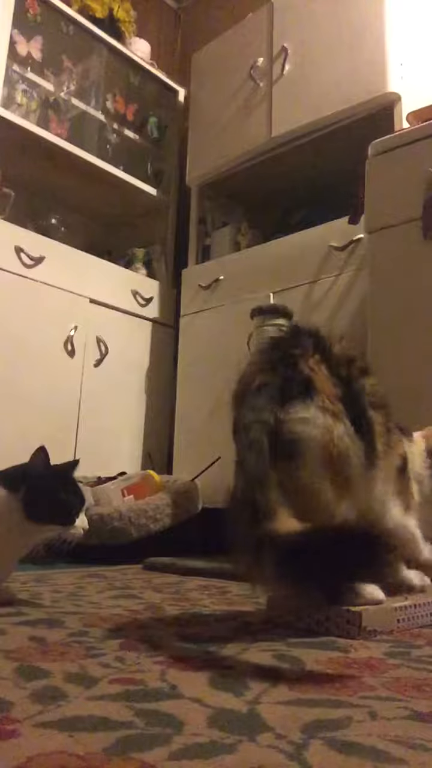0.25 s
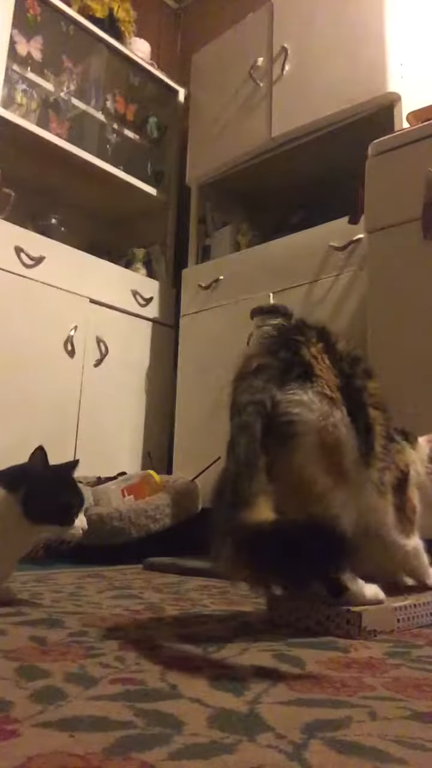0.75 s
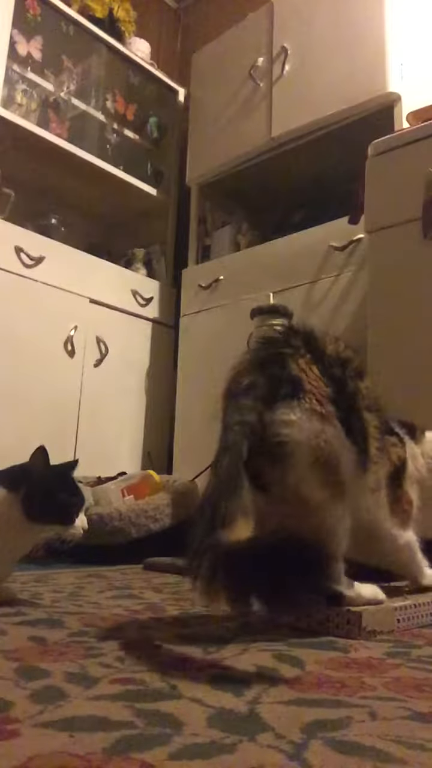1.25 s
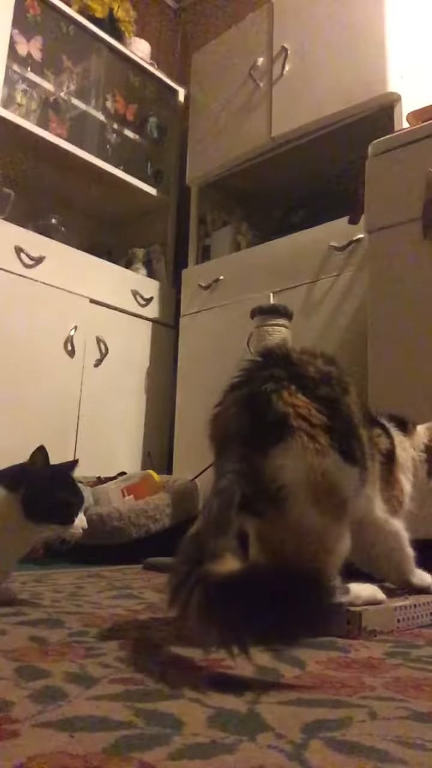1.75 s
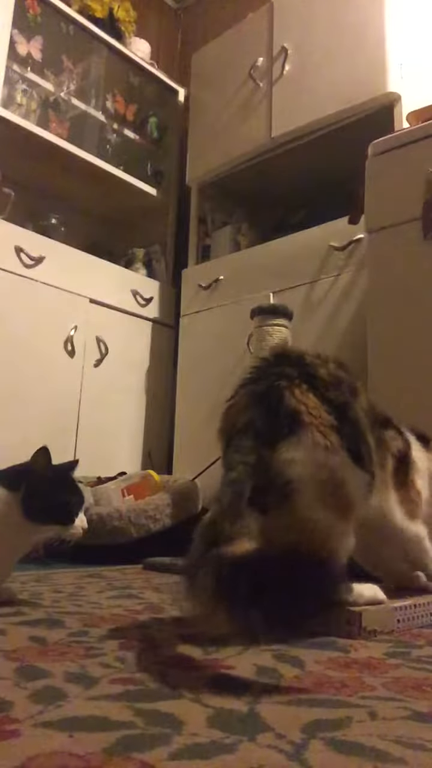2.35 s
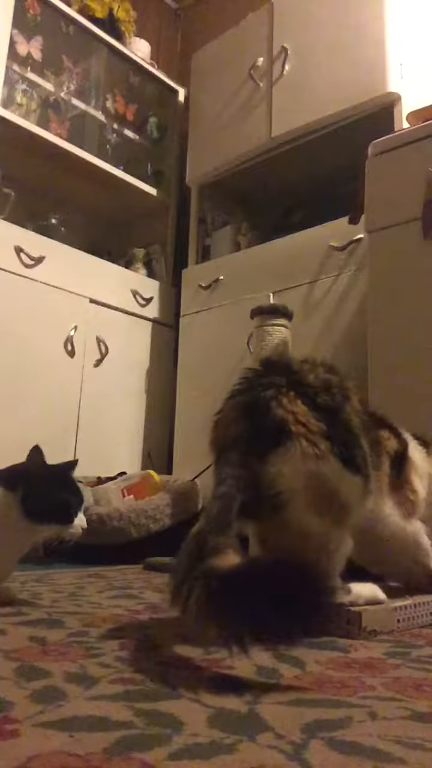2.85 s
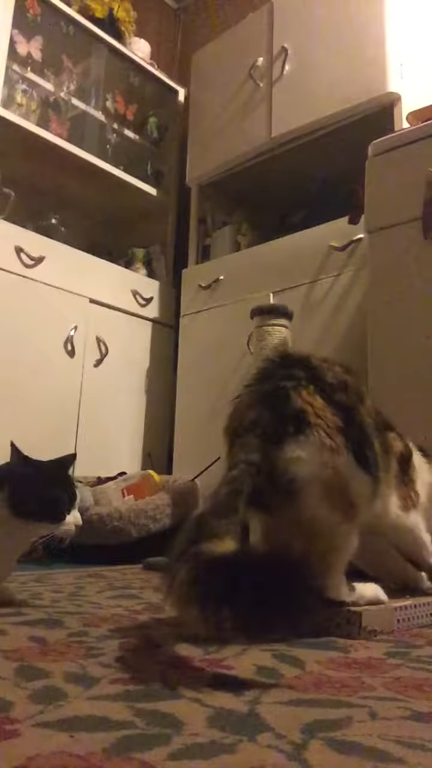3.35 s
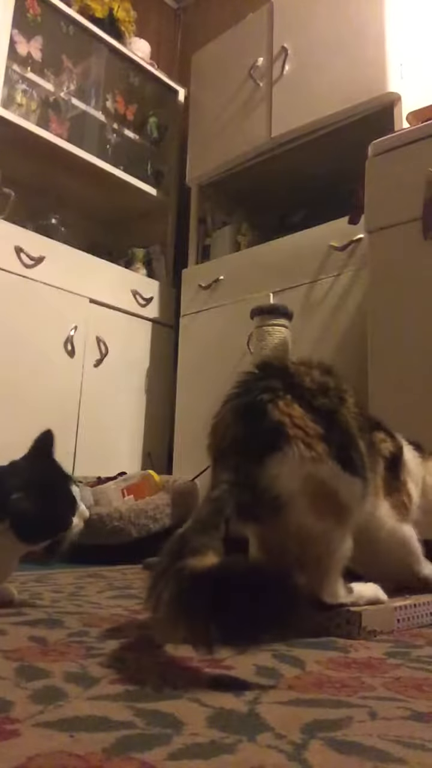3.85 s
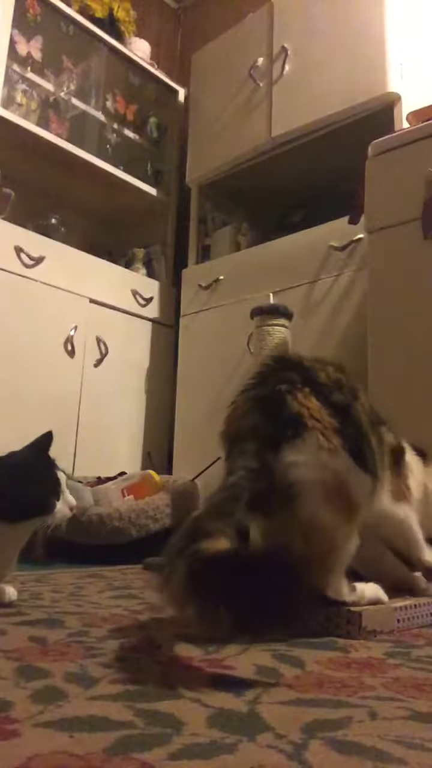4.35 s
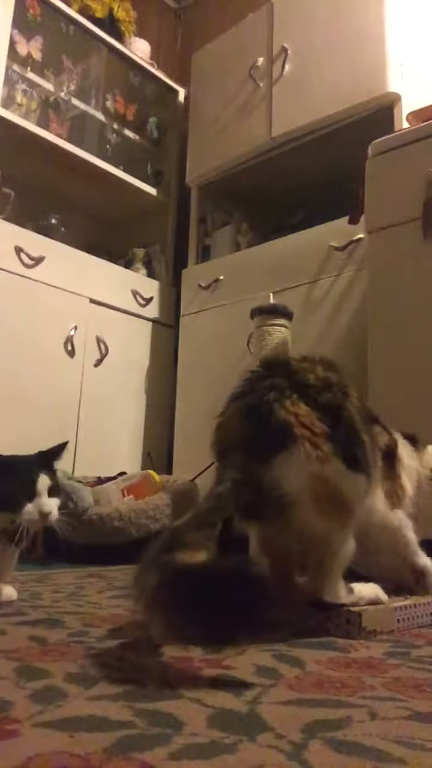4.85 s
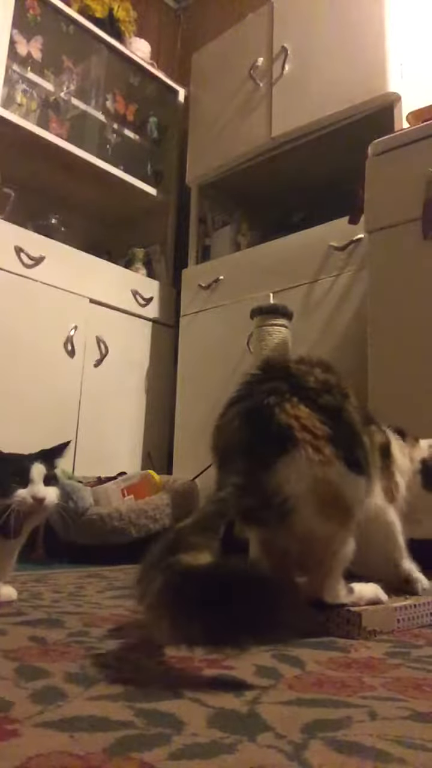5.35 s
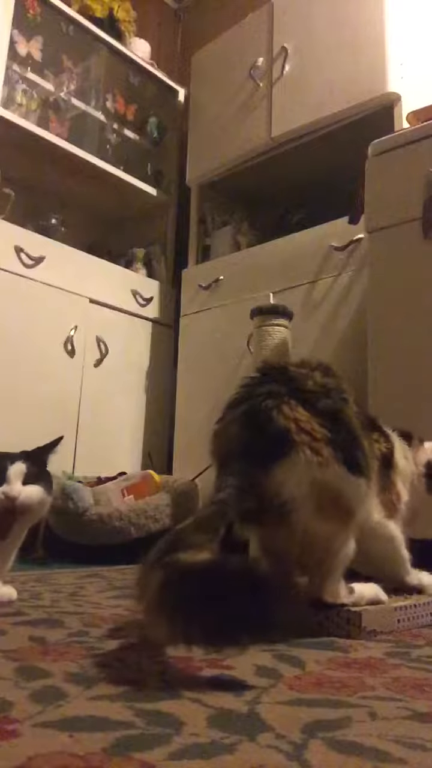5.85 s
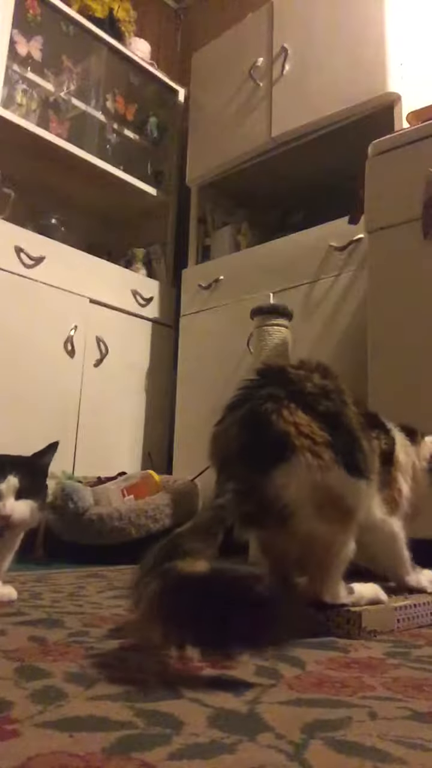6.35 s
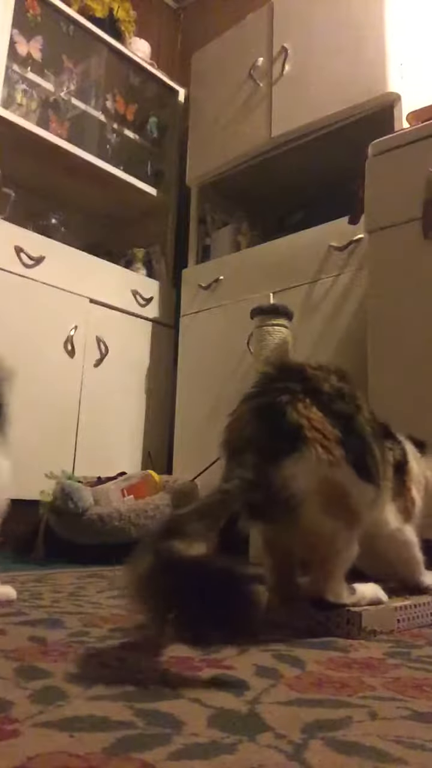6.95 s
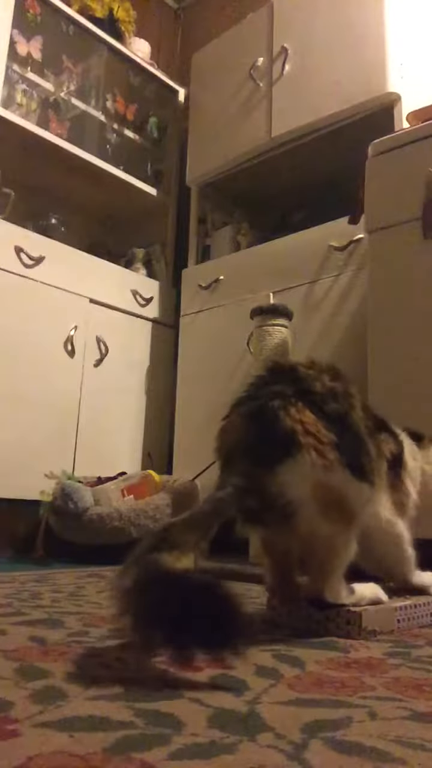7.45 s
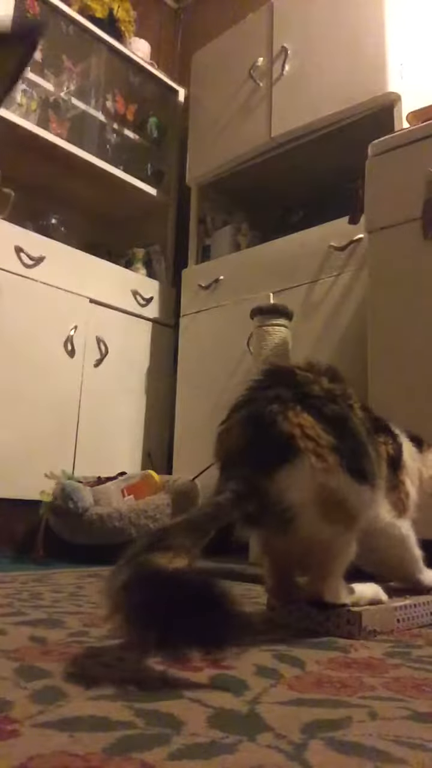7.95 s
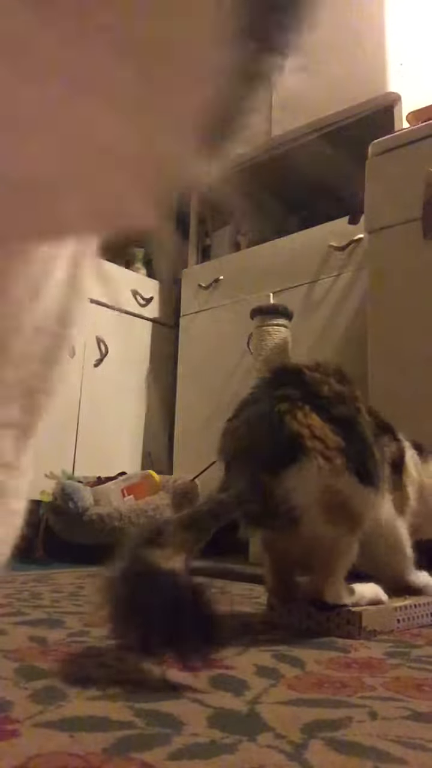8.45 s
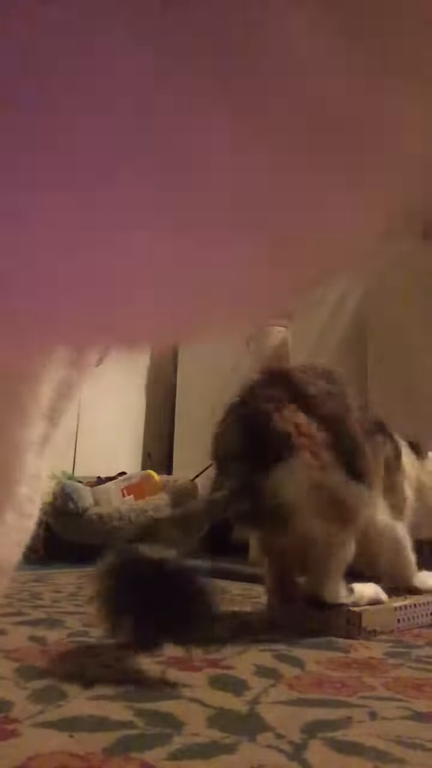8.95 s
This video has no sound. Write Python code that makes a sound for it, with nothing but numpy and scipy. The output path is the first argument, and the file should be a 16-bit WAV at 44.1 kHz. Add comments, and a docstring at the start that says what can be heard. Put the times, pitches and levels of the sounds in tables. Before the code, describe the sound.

A cat scratches a corrugated cardboard pad from the start, in a quick, irregular run of short, dry, grainy rasps, several a second. Her claws catch and release with crisp snaps and occasional bright ticks of tearing paper. Heavier paw blows add soft, low thumps through the carpeted floor, notably around 0.6, 0.9 and 3.1 seconds. The sharpest snap comes with a thump at about 4.1 seconds, followed by more strong strokes up to 4.6. The scratching carries on unevenly with only tiny gaps, with further firm hits near 6.8 and 7.1 seconds, then somewhat lighter strokes. The kitchen is small and nearly free of echo, with faint room noise and a very quiet appliance hum underneath. At about 9.1 seconds a second cat brushes the microphone: a very brief, loud, hollow tone that rises slightly, with a close rubbing hiss.

```python
"""Cat at a scratching pad

A cat rakes a corrugated cardboard pad on a carpeted floor in a small kitchen. Her claws catch and snap
the flutes and drag through them in grainy stick-slip strokes; the heavier paw blows thump the floor.
An appliance hums. At the end a second cat brushes the microphone: a hollow tone and a close hiss."""
import sys
import numpy as np
from scipy import signal
from scipy.fft import rfft, irfft, next_fast_len
from scipy.io import wavfile
from scipy.ndimage import uniform_filter1d, map_coordinates

SR = 44100
rng = np.random.default_rng(int(sys.argv[2]) if len(sys.argv) > 2 else 0)


def master(y):
    """Save y as 16-bit WAV."""
    cut = np.clip(np.atleast_2d(y).T, -1, 1)
    pcm = np.round(cut * 32767)  # scale
    wavfile.write(sys.argv[1], SR, pcm.astype(np.int16))


N = 405146

# claw catches: t/s, level/dB, ring f/Hz, puff re level/dB
CATCHES = [(0.027, -30, 1090, 4), (0.056, -25, 1110, -9), (0.064, -22.5, 2140, -11),
           (0.107, -23, 1510, -15), (0.263, -31, 1690, 4), (0.3, -22, 1540, -1), (0.397, -24, 1260, -3),
           (0.615, -23.5, 1010, 11), (0.63, -13.5, 975, -12), (0.675, -24, 1900, -3), (0.691, -29, 1840, 3),
           (0.717, -26.5, 600, 0), (0.861, -22, 600, 3), (0.8671, -13.5, 1160, -7),
           (0.926, -21.5, 1700, -6), (0.951, -20.5, 2240, 4), (0.974, -21, 1970, 5.5),
           (1.126, -33.5, 1800, 7), (1.147, -18, 1800, 10), (1.19, -39, 1960, 4), (1.202, -25.5, 1870, 5.5),
           (1.263, -35, 1700, -5), (1.314, -36.5, 1410, -8), (1.473, -40.5, 2400, -8),
           (1.531, -21.5, 1970, 7), (1.54, -26, 1820, 7), (1.633, -26, 950, -8), (1.734, -27.5, 1500, 4.5),
           (1.807, -25.5, 1980, -10), (1.818, -30, 1300, 16), (1.978, -17, 1830, 4.5),
           (2.051, -38, 1820, -3), (2.068, -31, 1840, 4), (2.101, -37.5, 2260, 3), (2.205, -37, 1800, -6),
           (2.223, -29.5, 1660, 5.5), (2.308, -13.5, 1880, -1), (2.374, -22, 2270, -2),
           (2.39, -28, 1780, 9), (2.403, -24, 1700, -4), (2.426, -27, 2020, 4), (2.469, -34, 1700, 3),
           (2.476, -33, 2550, -4), (2.49, -31, 1660, 0), (2.529, -37, 3100, -3), (2.559, -41.5, 1690, 22),
           (2.601, -32, 900, -6), (2.647, -36, 920, -3), (2.666, -28, 1820, -1), (2.727, -36, 3260, -2),
           (2.793, -30, 1540, 1), (2.808, -44, 2100, -2), (2.836, -34, 1900, 14), (2.86, -24.5, 1610, 2),
           (2.9291, -13, 2040, -15), (3.04, -31.5, 1780, -15), (3.087, -23.5, 1550, 11.5),
           (3.094, -15, 1380, 4), (3.344, -24, 870, 5), (3.392, -24, 2270, -2), (3.436, -26, 1740, -7),
           (3.547, -24, 1910, 7), (3.68, -25.5, 1530, 12.5), (3.692, -29, 1700, 6), (3.837, -25, 1760, 1),
           (4.093, -9, 2600, 4.5), (4.1, -17.5, 1070, 1), (4.11, -19, 1520, 2), (4.185, -27.5, 1620, -12),
           (4.34, -22, 1120, 13), (4.405, -23, 2260, 7), (4.414, -28.5, 970, 4), (4.582, -16.5, 2630, 7),
           (4.59, -15, 1280, 4), (4.631, -21, 1720, -5), (4.657, -23, 1450, 8), (4.676, -25.5, 940, 7),
           (4.816, -28.5, 1520, -2), (4.875, -30, 1700, 10), (4.914, -29, 1160, 0.5), (4.978, -38, 930, 15),
           (5.011, -24, 1550, 3.5), (5.066, -23, 1780, 9.5), (5.109, -21.5, 1570, 10),
           (5.167, -34.5, 2650, -6), (5.257, -29, 1580, 8), (5.333, -25, 1900, -2), (5.431, -25.5, 1110, 6),
           (5.445, -31, 1940, 9), (5.577, -38, 2050, -8), (5.657, -19.5, 1080, 10), (5.7, -18, 1850, -4),
           (5.746, -23, 1670, -11), (6.051, -26.5, 620, 10), (6.225, -18.5, 1450, 7.5),
           (6.235, -21, 1160, -1), (6.284, -33, 1550, 2), (6.299, -37.5, 910, 15), (6.35, -26, 1520, -3),
           (6.427, -37.5, 1500, -8), (6.525, -24.5, 1500, 10), (6.805, -23.5, 1880, 9),
           (6.816, -16.5, 1760, 11.5), (7.073, -14, 3130, 1), (7.082, -23.5, 1020, 6.5),
           (7.269, -12, 1780, -15), (7.279, -24, 2150, 6), (7.336, -30, 1210, 4), (7.478, -27.5, 1970, 6.5),
           (7.566, -35, 1780, 6), (7.672, -48, 1830, 14), (7.701, -27, 1960, 6), (7.717, -25.5, 1390, 10),
           (7.754, -34, 1640, 2), (7.807, -28, 1500, -14), (7.859, -26, 2200, -21), (8.039, -31, 2020, -8),
           (8.057, -23.5, 2200, -11), (8.133, -24, 2040, 0), (8.174, -36, 1800, 0), (8.298, -24.5, 1720, 1),
           (8.395, -20, 1760, -2), (8.503, -23, 1600, -7), (8.585, -35, 1860, -2), (8.597, -25.5, 520, 7.5),
           (8.606, -32.5, 557, 8), (8.696, -41.5, 1900, -6), (8.828, -16.5, 1540, -1.5),
           (8.881, -34.5, 2980, 5), (9.078, -37, 2010, 4), (9.092, -17, 3370, -7), (9.13, -20.5, 2980, -5)]
# spectrum of the flute walls: f/Hz, density/dB
WALL_SPECTRUM = [(350, -8), (600, -4), (728, -7), (946, -4), (1270, -3), (1780, 0), (3270, -11),
                 (3800, -12), (4500, -27.5), (5850, -46), (9900, -120)]
# modes of the floor boards: f/Hz, level/dB, T60/s
FLOOR_MODES = [(67.4, 7, 0.22), (96, -3.5, 0.23), (39.2, -4.5, 0.28), (188.9, -15.5, 0.3)]
# excitation by the cat's shifting weight: t/s, level/dB
WEIGHT_SHIFTS = [(0.0, -64), (0.43, -71), (1.19, -64.5), (2.28, -67), (2.46, -58.5), (3.42, -69.5),
                 (3.57, -62), (4.38, -66.5), (5.27, -60), (5.45, -70), (6.36, -62.5), (6.77, -69.5),
                 (7.37, -62.5), (8.19, -69), (8.46, -61.5), (9.1, -69)]


def amp(db):
    """Amplitude ratio of a level."""
    return 10 ** (np.asarray(db) / 20)


def unit(x):
    """Normalisation to rms 1."""
    return x / np.sqrt(np.mean(x ** 2) + 1e-20)


def along(points, hz):
    """Interpolation of (f/Hz, value) points on a log frequency axis."""
    f, values = np.transpose(points)
    return np.interp(np.log(hz + 1), np.log(f + 1), values)


def curves(rows):
    """Linear interpolation in time of each column after t/s."""
    times, *columns = np.transpose(rows)
    return [np.interp(np.arange(N) / SR, times, column) for column in columns]


def wobble(rate):
    """Smooth random modulation: a spline through `rate` knots a second."""
    return map_coordinates(rng.standard_normal(int(N * rate / SR) + 4), [np.arange(N) * rate / SR])


def filtered(x, response):
    """Linear filtering: the spectrum of x times a frequency response."""
    size = next_fast_len(N + SR // 2)
    return irfft(rfft(x, size) * response(np.fft.rfftfreq(size, 1 / SR)), size)[:N]


def coloured(x, spectrum):
    """Spectral shaping by (f/Hz, level/dB) points, at rms 1."""
    return unit(filtered(x, lambda hz: amp(along(spectrum, hz))))


def band(lo_hz, hi_hz):
    """Causal band-pass response with second-order slopes."""
    return lambda hz: (1j * hz / (lo_hz + 1j * hz) * hi_hz / (hi_hz + 1j * hz)) ** 2


def superpose(times, shapes, lead=0):
    """Superposition of short sounds, each begun `lead` samples before its time."""
    at = np.round(np.asarray(times) * SR).astype(int)[:, None] + np.arange(shapes.shape[1])
    return np.bincount(at.ravel(), shapes.ravel(), N + shapes.shape[1])[lead:N + lead]


def crackle(rate, spread_db, life_s):
    """Poisson process: decaying grains of noise, uneven in size."""
    starts = (rng.random(N) < rate / SR) * amp(spread_db * rng.standard_normal(N))
    envelope = signal.lfilter([1], [1, -np.exp(-1 / (life_s * SR))], starts)
    return envelope * rng.standard_normal(N)


def resonate(x, modes, sway_db, rate):
    """Forced resonance: x drives parallel modes, each swelling and fading on its own."""
    total = 0
    for hz, width, db in modes:
        mode = filtered(x, lambda f: 1j * f * width / (hz * hz - f * f + 1j * f * width))
        total += amp(db + sway_db * wobble(rate)) * mode
    return unit(total)


def room_noise():
    """Ambient noise: a continuous spectrum, strongest in the bass."""
    # room air: f/Hz, density/dB
    spectrum = [(15, -43), (25, 8), (145, -7.5), (270, -6), (394, -3), (451, -19), (545, -10), (624, -14.5),
                (1370, -46), (2220, -52), (3430, -22.5), (5730, -24.5), (16000, -34.5)]
    return amp(-64 + 0.44 * wobble(24)) * coloured(rng.standard_normal(N), spectrum)


def appliance_hum():
    """Two pure tones under random amplitude and frequency modulation."""
    # hum: f/Hz, level/dB, wander/Hz
    tones = [(139, -66.5, 0.48), (220.6, -68.5, 7.04)]
    hum = np.zeros(N)
    for hz, db, wander_hz in tones:
        phase = 2 * np.pi * np.cumsum(hz + wander_hz * wobble(32)) / SR
        hum += amp(db + 3.7 * wobble(28)) * np.sin(phase)
    return hum


def reverberation(x):
    """Diffuse decay: each quarter second of x is convolved with its own dying noise."""
    # kitchen reverberation time: f/Hz, T60/s
    decay_times = [(150, 0.11), (1000, 0.15), (4000, 0.14), (12000, 0.27)]
    out, step = np.zeros(N + 2 * SR), SR // 4
    for start in range(0, N, step):
        hz, t, noise = signal.stft(rng.standard_normal(SR // 3), SR, nperseg=256)
        tail = signal.istft(noise * amp(-60 * t / along(decay_times, hz)[:, None]), SR, nperseg=256)[1]
        wet = signal.fftconvolve(x[start:start + step], tail / np.linalg.norm(tail))
        out[start + 200:][:len(wet)] += wet
    return out[:N]


def floor_shudder():
    """Random forcing: the floor trembles at its strongest mode under the working cat."""
    mode_hz = FLOOR_MODES[0][0]
    tremor = filtered(rng.standard_normal(N), lambda hz: np.exp(-((hz - mode_hz) / 14) ** 2))
    return amp(curves(WEIGHT_SHIFTS)[0] + 3.1 * wobble(7.0)) * unit(tremor)


def microphone_brush():
    """Contact friction: a climbing hollow tone, a hiss modulated at its pitch and a gliding rasp."""
    # course of the contact: t/s, tone/dB, hiss and rasp/dB, rasp f/Hz
    contact = [(9.1, -95, -71, 1800), (9.112, -25, -54, 1820), (9.125, -20.5, -46, 1820),
               (9.14, -20, -37, 2020), (9.151, -14, -29.5, 2240), (9.163, -31, -30, 2270),
               (9.171, -31, -35.5, 2150), (9.179, -27, -36, 2080), (9.19, -26, -40, 2000)]
    # close hiss: f/Hz, density/dB
    hiss_spectrum = [(260, -43), (450, 5), (715, 14), (1530, -16), (1730, -3), (2010, -3), (2230, 10),
                     (3540, -5.5), (4770, -2.5), (5880, -9), (7470, -11.5), (8290, -20.5), (16000, -21)]
    # resonances in the hiss: f/Hz, bandwidth/Hz, level/dB
    hiss_modes = [(1740, 73, 5), (2730, 140, -6), (4760, 190, -6)]
    start_hz, climb_hz_per_s = 290.5, 280
    tone_db, hiss_db, rasp_hz = curves(contact)
    since = np.arange(N) / SR - contact[0][0]
    touching = since > 0
    phase = 2 * np.pi * np.cumsum((start_hz + climb_hz_per_s * since + 12 * wobble(70)) * touching) / SR
    tone = amp(tone_db) * (np.sin(phase) + 0.081 * np.sin(2 * phase))
    hiss_gain = amp(hiss_db + wobble(220)) * (1 + 0.54 * np.sin(phase))
    rubbing = resonate(rng.standard_normal(N), hiss_modes, sway_db=4, rate=28)
    hiss = hiss_gain * coloured(rubbing + 1.15 * rng.standard_normal(N), hiss_spectrum)
    rasp = amp(hiss_db) * wobble(360) * np.sin(2 * np.pi * np.cumsum(rasp_hz) / SR)
    return touching * (tone + hiss + rasp)


def paw_blows():
    """Impact excitation: the pad slaps the carpet and the floor's damped modes swell into a low ring."""
    # blows: t/s, thump/dB, slap re thump/dB
    blows = [(0.048, -39, 28), (0.627, -29, 21), (0.858, -27.5, 8), (1.15, -44.5, 13), (1.53, -47, 21),
             (2.302, -32.5, 5), (2.552, -55, 22), (3.086, -24.5, 25), (3.347, -31.5, 20.5),
             (4.09, -27, 24.5), (4.341, -31.5, 26.5), (4.58, -24, 24.5), (5.106, -41, 12), (5.26, -50, 29),
             (5.652, -47, 38), (6.525, -54.5, 34), (6.812, -26, 27.5), (7.07, -27.5, 21.5),
             (7.266, -40.5, 2), (7.481, -47, 32), (7.86, -45, 32.5), (8.059, -39.5, 10), (8.299, -37.5, -2),
             (8.594, -44.5, 11), (8.824, -34.5, -5), (9.041, -37, 18.5)]
    onset, thump_db, slap_db = np.transpose(blows)[:, :, None]
    t = np.arange(SR // 3) / SR
    rise = (1 - np.exp(-t / 0.012)) ** 2
    ring = sum(amp(db - 60 * t / t60) * np.sin(2 * np.pi * hz * t) for hz, db, t60 in FLOOR_MODES)
    slap = rise * amp(thump_db + slap_db - 60 * t / 0.15) * rng.standard_normal((len(blows), len(t)))
    thumps = superpose(onset[:, 0], amp(thump_db) * rise * ring)
    slaps = filtered(superpose(onset[:, 0], slap), band(104, 306))
    return filtered(thumps + slaps, band(22, 360))


def dispersion(x, cycles):
    """Bending waves in the pad are dispersive: the treble arrives ahead of the bass."""
    return filtered(x, lambda hz: np.exp(-2j * np.pi * cycles * (np.log(1 + hz / 260) - hz / 2500)))


def pad_creak():
    """Acoustic emission under load: the pad creaks faintly as the weight shifts."""
    loaded = np.arange(N) < WEIGHT_SHIFTS[-1][0] * SR
    gain = amp(curves(WEIGHT_SHIFTS)[0] + 0.25 * wobble(30)) * loaded
    return gain * coloured(crackle(rate=2500, spread_db=5, life_s=0.0018), WALL_SPECTRUM)


def fibre_ticks():
    """Brittle fracture: dry paper breaks in bright clicks, each a noise band around its own pitch."""
    # breaking fibres: t/s, level/dB, f/Hz
    ticks = [(0.63, -19, 6240), (1.632, -30.5, 5120), (2.25, -31, 5600), (2.264, -21.5, 7700),
             (2.279, -22.5, 5400), (2.296, -28, 6400), (4.343, -41, 6950), (5.259, -29, 5700),
             (6.524, -30, 11000), (6.814, -29, 6140), (7.4373, -26, 10700), (8.05, -31, 5430)]
    onset, level_db, pitch_hz = np.transpose(ticks)[:, :, None]
    t = np.arange(500) / SR
    rough = 1.24 * uniform_filter1d(rng.standard_normal((len(ticks), len(t))), size=11, axis=1)
    burst = amp(level_db - 60 * t / 0.025) * rough * np.sin(2 * np.pi * pitch_hz * t)
    return filtered(superpose(onset[:, 0], burst), lambda hz: band(4600, 12500)(hz) ** 2)


def wall_slips(rate, spread_db, cycles):
    """Free vibration: walls slip off the claws at random pitches, decaying by 1/e in `cycles` periods."""
    draw = rng.random((int(rate * N / SR), 2))
    onset, hz = draw[:, 0] * N / SR, 500 + 4200 * draw[:, 1:]
    t = np.arange(350) / SR
    size = amp(spread_db * rng.standard_normal(hz.shape)) * np.sqrt(hz)
    return superpose(onset, size * np.sin(2 * np.pi * hz * t) * np.exp(-t * hz / cycles))


def stroke_envelopes():
    """Amplitude envelopes of rasp, treble and body: the strokes, plus a short rip around every catch."""
    # claw strokes: t/s, length/s, start level/dB, end level/dB, treble re level/dB, body re level/dB
    strokes = [(0.0, 0.071, -34, -65, -19, -8), (0.036, 0.076, -50.5, -40.5, -16, -6.5),
               (0.095, 0.047, -28, -64, -22, -22), (0.263, 0.028, -46, -51, -24, -16),
               (0.287, 0.065, -39, -60, -19, -6), (0.335, 0.049, -49, -46, -16, -4),
               (0.362, 0.091, -49, -62, -17, -8.5), (0.508, 0.15, -69, -59, -16, -14),
               (0.6, 0.15, -40, -60, -17.5, -2.5), (0.74, 0.041, -59, -54, -24, -16),
               (0.841, 0.1, -36.5, -59.5, -18, 2), (0.926, 0.1, -46, -64, -17, -18),
               (1.117, 0.065, -62, -30.5, -15, -2), (1.175, 0.13, -41, -62.5, -13, -5.5),
               (1.306, 0.071, -60.5, -46, -16, -6.5), (1.526, 0.11, -43, -54.5, -17.5, -8),
               (1.621, 0.042, -42, -54, -13, 1.5), (1.689, 0.11, -50, -49.5, -14.5, -12),
               (1.771, 0.076, -59, -34.5, -16, -13.5), (1.933, 0.14, -52.5, -49, -17.5, -12),
               (2.202, 0.04, -54, -54, -12, -6), (2.292, 0.099, -38, -53.5, -15.5, -5.5),
               (2.372, 0.15, -39, -60.5, -13, -7.5), (2.526, 0.11, -53, -49.5, -14, -2.5),
               (2.642, 0.083, -44, -52, -11.5, -7), (2.772, 0.099, -52, -47.5, -17, -13),
               (2.915, 0.08, -71, -59, -31, -21), (3.075, 0.15, -40, -57, -25, -15),
               (3.21, 0.037, -47.5, -49, -25, -13), (3.31, 0.065, -52.5, -34, -9.5, -3),
               (3.364, 0.092, -46, -44, -18, -14), (3.538, 0.056, -49.5, -63, -9, 4),
               (3.574, 0.077, -54, -44.5, -19, -6), (3.661, 0.095, -50.5, -47.5, -12.5, -5),
               (3.744, 0.074, -42.5, -63.5, -15.5, -7), (3.818, 0.086, -43, -64, -18, -23),
               (3.906, 0.097, -48, -66, -21, -8.5), (4.091, 0.14, -36, -63, -25, -22),
               (4.332, 0.04, -28.5, -48, -17, -7), (4.375, 0.098, -47.5, -57, -25, -4.5),
               (4.561, 0.18, -46.5, -41, -13, -7), (4.801, 0.073, -50, -63, -10, -2),
               (4.854, 0.05, -48, -53, -20, -6), (4.902, 0.037, -50, -53, -20, -8),
               (4.995, 0.037, -50, -60, -24, -8), (5.037, 0.06, -49, -43, -16, -6),
               (5.086, 0.057, -44, -55, -17, 0.5), (5.144, 0.049, -50, -55, -14, -4),
               (5.213, 0.11, -48, -52, -12, 0), (5.311, 0.092, -52.5, -53, -20, -9),
               (5.383, 0.09, -56, -38, -16, -3), (5.608, 0.071, -58, -46, -43, -6),
               (5.681, 0.085, -53.5, -36, -15, -8.5), (5.869, 0.14, -45.5, -49, -20, -9.5),
               (5.996, 0.089, -42.5, -43, -19.5, -3.5), (6.208, 0.06, -48, -45, -11, 0.5),
               (6.259, 0.065, -52, -42, -9, -5.5), (6.319, 0.073, -64, -51.5, -13, -6),
               (6.516, 0.061, -33.5, -65.5, -17, 0), (6.797, 0.15, -31, -72.5, -10, -9),
               (7.074, 0.13, -43, -62, -24, -5.5), (7.177, 0.042, -51, -50, -24, -15),
               (7.251, 0.12, -40.5, -53.5, -17, -6), (7.462, 0.12, -40, -60.5, -11, -10),
               (7.559, 0.059, -50.5, -55, -14, -5), (7.68, 0.11, -41.5, -56, -16, -9),
               (7.776, 0.068, -50, -58, -17, -29), (7.829, 0.061, -66, -44, -9, 3),
               (7.906, 0.031, -37.5, -54, -13, -24), (8.036, 0.07, -44, -66, -2.5, -7),
               (8.095, 0.11, -50.5, -58.5, -14, -4), (8.283, 0.098, -44, -76, -12, -1),
               (8.375, 0.047, -49.5, -41.5, -12, -8.5), (8.477, 0.11, -50, -52.5, -13, -5),
               (8.578, 0.039, -58, -46, -8, 8), (8.81, 0.041, -47, -53, -7, -11),
               (8.854, 0.062, -44, -55, -14, -8.5), (9.067, 0.048, -44.5, -40.5, -9.5, 2)]
    attack_s, release_s = 0.013, 0.024
    rip_rise_s, rip_fall_s, rip_treble_db, rip_body_db = 0.0012, 0.0078, -24.5, -8
    onset, length, start_db, end_db, treble_db, body_db = np.transpose(strokes)[:, :, None]
    t = np.arange(-SR // 8, SR // 3) / SR
    gate = np.clip(np.minimum(t / attack_s, (length - t) / release_s), 0, 1) ** 2
    stroke = gate * amp(start_db + (end_db - start_db) * np.clip(t / length, 0, 1))
    catch_time, catch_db, *_ = np.transpose(CATCHES)[:, :, None]
    rip = amp(catch_db - 24 - 6 * (t / np.where(t < 0, rip_rise_s, rip_fall_s)) ** 2)
    rips = superpose(catch_time[:, 0], rip, lead=SR // 8)
    return [superpose(onset[:, 0], stroke * amp(stroke_db), lead=SR // 8) + amp(rip_db) * rips
            for stroke_db, rip_db in ((0, 0), (treble_db, rip_treble_db), (body_db, rip_body_db))]


def claw_drag():
    """Stick-slip friction: claws stutter over the flutes; torn fibres add treble, the hollow pad body."""
    # pad resonances that strokes wake by turns: f/Hz, bandwidth/Hz, level/dB
    flute_modes = [(953, 72, 4.5), (1556, 81, -2.5), (1790, 120, -1.5), (2140, 780, -3.5), (2610, 380, -3),
                   (3880, 180, -8)]
    # tearing paper fibres: f/Hz, density/dB
    fibre_spectrum = [(2650, -8), (4500, -5.5), (5080, -14.5), (5840, -7), (7070, -12.5), (8030, -19),
                      (10300, -21), (12700, -14), (16000, -25.5)]
    # the hollow pad: f/Hz, density/dB
    body_spectrum = [(88, -31), (150, -20), (226, 4), (296, -8.5), (400, 4), (512, -2.5), (650, -6),
                     (840, -57), (1430, -120)]
    rasp_gain, treble_gain, body_gain = stroke_envelopes()
    slips = unit(wall_slips(rate=1500, spread_db=4.2, cycles=4.5))
    grit = unit(crackle(rate=620, spread_db=3, life_s=0.004))
    walls = coloured(slips + 0.86 * grit, WALL_SPECTRUM)
    rasp = unit(walls + 0.6 * resonate(walls, flute_modes, sway_db=4, rate=22))
    fibres = coloured(crackle(rate=2100, spread_db=10, life_s=0.0027), fibre_spectrum)
    body = coloured(crackle(rate=420, spread_db=4, life_s=0.0025), body_spectrum)
    return rasp_gain * rasp + treble_gain * fibres + body_gain * body


def flute_snaps():
    """Sudden release of strain: a caught flute cracks, its wall rings raggedly and the pad puffs."""
    # response that colours a catch: f/Hz, gain/dB
    response = [(300, -20), (700, -6), (1800, -4), (3000, -9.5), (4500, -23), (7000, -39), (10400, -67),
                (13000, -58), (16000, -42)]
    burst_t60_s, ring_t60_s, puff_t60_s = 0.01, 0.013, 0.021
    onset, level_db, pitch_hz, puff_db = np.transpose(CATCHES)[:, :, None]
    t = np.arange(900) / SR
    noise = rng.standard_normal((len(CATCHES), 2, len(t)))
    noise /= noise[:, :, :100].std(axis=2, keepdims=True)  # every catch starts at full strength
    ring = 1.216 * amp(-60 * t / ring_t60_s) * np.sin(2 * np.pi * pitch_hz * t)
    burst = 0.45 * amp(-60 * t / burst_t60_s) * noise[:, 0]
    wall = (1 - np.exp(-t / 0.00037)) * amp(level_db) * (ring + burst)
    wall[:, 20] += 8 * amp(level_db[:, 0])  # the fibre parts with one crisp crack
    puff = amp(level_db + puff_db - 60 * t / puff_t60_s) * noise[:, 1]
    cracks = filtered(superpose(onset[:, 0], wall), lambda hz: amp(along(response, hz)))
    return cracks + filtered(superpose(onset[:, 0], puff), band(244, 686))


def scene():
    """Superposition of the pad, its reverberation, the floor, the background and the second cat."""
    pad = dispersion(claw_drag() + pad_creak() + flute_snaps() + fibre_ticks(), cycles=1.686)
    tail = amp(-10) * reverberation(pad)
    floor = paw_blows() + floor_shudder()
    return (pad + tail + floor + room_noise() + appliance_hum() + microphone_brush())[None]


def record(dry):
    """Band limiting: the microphone drops the deepest bass, and nothing passes above the top frequency."""
    corner_hz, top_hz = 34, 15830
    return filtered(dry[0], lambda hz: (1j * hz / (corner_hz + 1j * hz)) ** 4 * (hz < top_hz))[None]


dry = scene()
out = record(dry)
master(out)
```